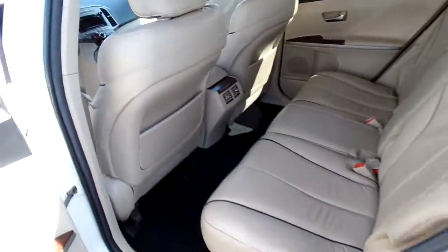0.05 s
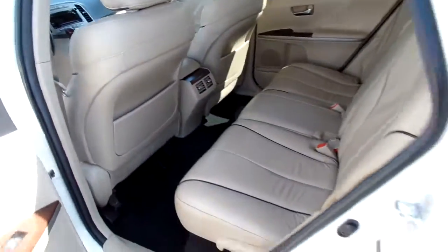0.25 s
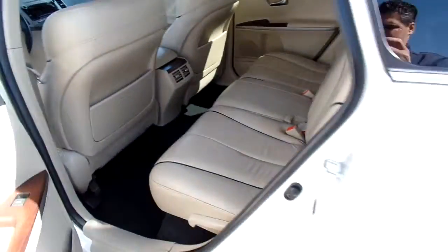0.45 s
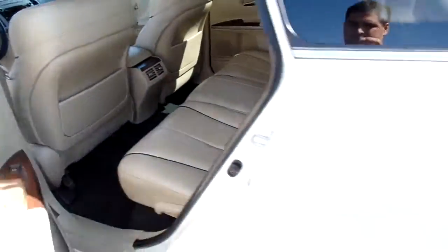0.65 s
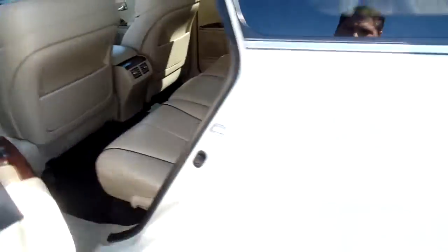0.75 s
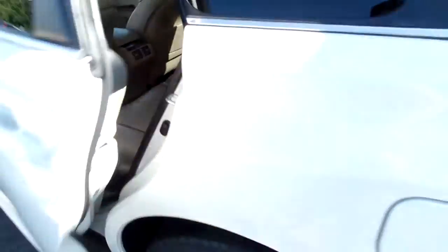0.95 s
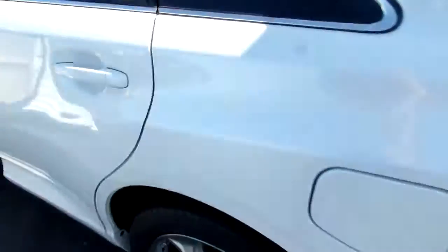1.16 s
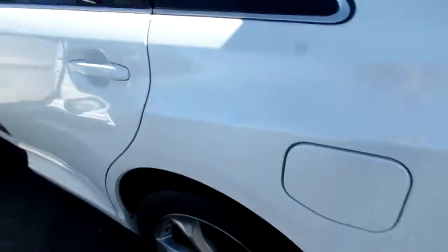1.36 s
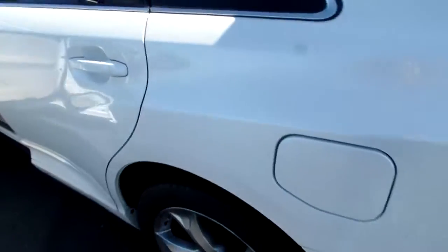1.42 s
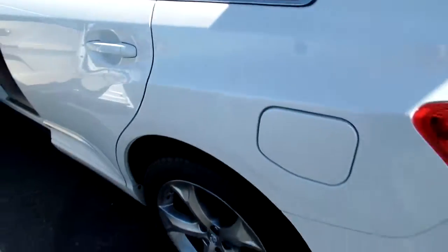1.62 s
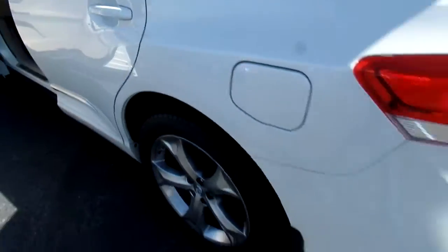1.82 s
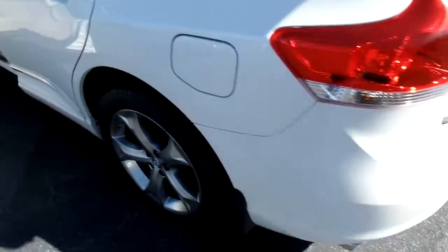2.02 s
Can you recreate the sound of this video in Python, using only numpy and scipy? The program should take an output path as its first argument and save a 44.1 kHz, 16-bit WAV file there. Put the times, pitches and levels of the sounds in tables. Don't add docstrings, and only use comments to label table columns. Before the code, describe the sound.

A car door slams about midway: a hard latch knock, then a sharp hollow thump with a brief panel shudder. Wind buffets the close handheld microphone before it and more strongly afterwards, outdoors over faint traffic.

```python
import sys
import numpy as np
from scipy import signal
from scipy.fft import rfft, irfft, next_fast_len
from scipy.io import wavfile
from scipy.ndimage import uniform_filter1d, map_coordinates

SR = 44100
rng = np.random.default_rng(int(sys.argv[2]) if len(sys.argv) > 2 else 0)


def dump_mix(stems):
    frames = np.atleast_2d(stems).T
    limited = np.clip(frames, -1, 1)
    pcm = np.round(limited * 32767).astype(np.int16)
    wavfile.write(sys.argv[1], SR, pcm)


def natural_amplitude(level_db):
    exponent = np.asarray(level_db, float) / 20
    return 10 ** exponent


N = 91860


def unit(x):
    return x / np.sqrt(np.mean(x ** 2) + 1e-20)


def noise(spectrum):
    m = next_fast_len(N + 8192)
    f, db = np.transpose(spectrum)
    hz = np.fft.rfftfreq(m, 1 / SR)
    colour = natural_amplitude(np.interp(np.log(hz + 1), np.log(f + 1), db))
    return unit(irfft(rfft(rng.standard_normal(m)) * colour, m)[:N])


def wobble(rate):
    knots = rng.standard_normal(int(N * rate / SR) + 4)
    return map_coordinates(knots, [np.arange(N) * rate / SR])


def dying(s, rise_s, t60):
    t = np.maximum(np.arange(N) / SR - s, 0)
    return (1 - np.exp(-t / rise_s)) * natural_amplitude(-60 * t / t60)


def ring(modes, s, rise_s):
    t = np.arange(N) / SR - s
    total = np.zeros(N)
    for hz, db, t60 in modes:
        level = natural_amplitude(db + rng.normal(0, 0.8))
        total += level * dying(s, rise_s, t60) * np.sin(2 * np.pi * hz * t)
    return total / 2


def door_contacts():
    # f/Hz, level/dB, t60/s
    latch_modes = [(608, 1, 0.065), (770, -2, 0.03), (920, -13, .015), (1070, -10, 0.022),
                   (1500, -16, 0.01), (2080, -10, 0.012), (2480, 5, 0.013), (2750, -4, 0.01),
                   (3100, -3, 0.01), (3400, -5, 0.01), (5800, -24, .01)]
    # f/Hz, level/dB, t60/s
    panel_modes = [(63.4, -19, 0.62), (151, -10, 0.11), (230, 0, 0.08), (360, -15, 0.098), (616, -6, 0.053),
                   (980, 1, 0.019), (1350, -14, 0.009)]
    # f/Hz, level/dB
    crack_spectrum = [(250, -6), (500, 4), (1000, 5), (1600, -10.5), (2400, -3.5), (3300, -14.5),
                      (5000, -25), (16000, -31)]
    # t/s, latch level/dB, panel level/dB, crack level/dB
    contacts = [
        (1.1442, 10.5, -11, -7),
        (1.1498, -22, -13, -9),
        (1.1571, -29, -4, -6),
        (1.1606, -7, 3.5, -2.5),
        (1.1623, -23, -1, -8.5),
        (1.1882, -23, -1.5, -8.5),
        (1.2289, -35, -17, -28),
    ]
    crack = noise(crack_spectrum)
    hits = np.zeros(N)
    for s, latch_db, panel_db, crack_db in contacts:
        hits -= natural_amplitude(latch_db) * ring(latch_modes, s, 0.0005)
        hits += natural_amplitude(panel_db) * ring(panel_modes, s, 0.00084)
        hits += natural_amplitude(crack_db) * dying(s, 0.00023, 0.034) * crack
    return hits


def door_shudder():
    # f/Hz, level/dB
    shudder_spectrum = [(30, -30), (70, -9), (230, 1.5), (500, -10.5), (1100, -17.5), (2200, -24),
                        (5000, -34.5), (16000, -47.5)]
    start_s, level_db, t60_s, rough_db = 1.162, -8.5, 0.29, 3
    rough = natural_amplitude(level_db + rough_db * wobble(120))
    return rough * dying(start_s, 0.0033, t60_s) * noise(shudder_spectrum)


def eddies(rows):
    s, db, hz, sign = np.transpose(rows)[..., None]
    at = np.round(s * SR).astype(int) + np.arange(-SR // 40, SR // 40)
    turn = (at / SR - s) * hz
    bell = np.exp(-(turn / 0.43) ** 2 / 2)
    swing = sign * natural_amplitude(db) * bell * np.cos(2 * np.pi * turn)
    return np.bincount(np.clip(at + 1, 0, N + 1).ravel(), swing.ravel(), N + 2)[1:N + 1]


def strong_eddies():
    # t/s, peak level/dB, f/Hz,
    # factor with push + or pull -
    single_eddies = [(0.6042, -20.5, 110, -1.03), (0.6207, -27, 201, 0.85), (0.6365, -18.5, 230, -1.1),
                     (0.6432, -21, 128, 1), (0.6494, -23, 230, -0.71), (0.658, -14.5, 234, 1),
                     (0.6694, -13.5, 190, 1), (0.6791, -11.5, 189, 0.72), (0.6875, -9.5, 272, -1.23),
                     (0.6961, -21, 167, 1), (0.7038, -1.5, 195, 1), (0.7182, -14, 190, -1.3),
                     (0.7932, -14, 225, -0.97), (0.8986, -8.5, 186, 0.49), (0.9148, -8.5, 256, 0.27),
                     (0.959, -17.5, 216, 1), (0.9779, -22, 240, 1), (0.9947, -11, 167, 0.67),
                     (1.0402, -24, 188, 0.9), (1.0544, -16, 233, -0.7), (1.0608, -17, 223, -1.07),
                     (1.0718, -18, 211, 0.64), (1.1349, -10, 244, 0.54),
                     (1.496, -9, 269, 0.57), (1.5133, -5, 256, 0.69), (1.5281, -10, 263, 1),
                  (1.5457, -9, 312, -1.2), (1.553, -11, 211, 0.86), (1.561, -6.5, 334, -1.35),
                  (1.574, -8, 363, -1.1), (1.5838, -11, 257, 0.58), (1.5942, -5, 285, -0.91),
                  (1.604, -13, 240, 0.72), (1.6269, -6, 190, 0.86), (1.6337, -7.5, 246, -1),
                  (1.648, -23, 305, -1.2), (1.6607, -6.5, 278, -1.2), (1.6989, -5.5, 335, 1),
                  (1.706, 2, 266, 0.89), (1.712, -9, 152, -1.5), (1.7256, 3.5, 660, 0.44),
                  (1.738, -13, 142, 0.76), (1.7452, -3.5, 355, 0.93), (1.77, -1.5, 305, -0.9),
                  (1.787, -14, 248, 0.88), (1.7971, -3, 205, -0.69), (1.8107, -3, 290, 0.77),
                  (1.824, -6, 232, 0.89), (1.8964, -11, 213, -1.5), (1.912, -9, 252, 0.96),
                  (1.9199, -9.5, 374, 0.95), (1.9853, -9.5, 326, 0.88),
                     (0.6346, -18.5, 230, 0.88), (0.6515, -14, 266, 1), (0.6558, -15, 282, 1),
              (0.6882, -10.5, 242, 1), (0.7012, -13, 253, 1), (0.862, -26, 90, 1), (0.885, -29, 69, -0.74),
              (0.925, -25, 60, 1), (0.9215, -18, 252, 0.84), (0.9362, -22, 200, 0.78),
              (0.983, -18.5, 236, 1), (1.21, -9, 220, 0.87), (1.232, -10, 201, 1), (1.262, -7.5, 260, 0.64),
              (1.275, -14, 200, -0.89), (1.289, -17, 150, 0.91), (1.311, -16, 260, -1),
              (1.331, -15.5, 225, 0.9), (1.329, -18, 70, 0.94), (1.36, -26, 177, 0.78),
              (1.392, -17, 168, -0.94), (1.435, -23, 300, 1), (1.461, -19, 200, -1),
              (1.485, -15, 200, 0.86), (1.502, -21, 130, 0.81), (1.536, -15, 230, 0.84),
              (1.541, -22, 130, 0.86), (1.6, -2, 258, -0.55), (1.617, -26, 200, 0.77),
              (1.637, -7.5, 151, 1), (1.6555, -9.5, 294, 1), (1.67, -14, 250, 1), (1.553, -20, 597, 0.89),
              (1.5777, -23, 325, 1), (1.718, -13, 200, 1), (1.755, -16, 200, 0.86), (1.781, -18, 150, 1),
              (1.85, -19, 300, 0.69), (1.87, -16, 250, 0.93), (2.016, -15, 176, 0.73),
              (1.9185, -24, 560, 0.63), (1.93, -21, 248, 0.72), (1.947, -21, 198, 1),
                     (0.3547, -22, 68, 1), (0.41, -31, 73, 0.87), (0.5572, -34, 58, -0.67),
                     (0.68, -14, 94, 1), (1.635, -19, 98, 0.43), (1.709, -29, 98, 0.62),
                     (1.796, -20, 75, -0.88), (1.5096, -8.5, 560, -0.86), (1.5292, -10.5, 760, 0.87),
                     (1.5583, -18, 531, -1.3), (1.5672, -10, 525, -1.06), (1.6309, -12.5, 564, -1.78),
                     (1.698, -5, 510, 0.76), (1.7061, -14, 596, 0.83), (1.7251, 1.5, 770, 0.67),
                     (1.7456, -13, 550, 0.97), (1.7727, -27, 563, 1), (1.8113, -18, 593, -1.1)]
    return eddies(single_eddies)


def wind_stream():
    # t/s, level/dB
    strength = [(0, -36), (.2, -36), (.36, -34.5), (.6, -38), (.67, -36), (.72, -29.5), (.83, -37.5),
                (0.921, -30.5), (1.1, -34), (1.3, -28.5), (1.44, -43.5), (1.521, -18), (1.62, -22.5),
                (1.68, -24.5), (1.78, -18.5), (1.86, -30), (1.983, -25), (2.08, -45.5)]
    # f/Hz, level/dB
    rumble_spectrum = [(15, -120), (38, -29), (60, -2.5), (120, 2.5), (250, -3), (500, -17), (900, -120)]
    per_s, usual_hz, quickest_hz, spread = 280, 227, 430, 0.26
    size_db, pitch_per_db = 2, 0.44
    t = np.arange(N) / SR
    at, db = np.transpose(strength)

    u = rng.random((1000, 3))
    s = np.cumsum(-np.log(u[:, 0])) / per_s
    lift = pitch_per_db * (np.interp(s, at, db) - db.mean())
    pitch = usual_hz * np.exp(lift + spread * rng.standard_normal(1000))
    peak_db = -size_db * np.log(u[:, 1])
    rows = np.transpose([s, peak_db, np.minimum(pitch, quickest_hz), np.sign(u[:, 2] - .5)])
    small = unit(eddies(rows[s < N / SR]))

    rumble_db = 1.0 * t + 1.2 * wobble(12.96)
    rumble = natural_amplitude(rumble_db) * noise(rumble_spectrum)
    return natural_amplitude(np.interp(t, at, db)) * (small + rumble)


def scuffs():
    # f/Hz, level/dB
    grit_spectrum = [(1200, -120), (1800, 12.5), (4500, 8.5), (9000, -1.5), (13000, 1.5), (17000, 1)]
    # t/s, level/dB, rise/s, t60/s
    steps = [
        (0.52, -37, 0.00087, 0.044),
        (1.09, -49, .002, 0.044),
        (1.93, -41, 0.018, 0.8),
        (2.053, -47, 0.0016, 0.1),
    ]
    envelope = sum(natural_amplitude(db) * dying(s, rise_s, t60) for s, db, rise_s, t60 in steps)
    return noise(grit_spectrum) * natural_amplitude(1.7 * wobble(170)) * envelope


def traffic():
    # f/Hz, level/dB
    road_spectrum = [(35, -55), (70, -10.5), (250, -8), (500, -10.5), (1200, -13.5), (2200, -22),
                     (3500, -29.5), (16000, -61)]
    fade_db = -1.7 * np.arange(N) / SR
    return natural_amplitude(-33 + fade_db + 0.5 * wobble(38.9)) * noise(road_spectrum)


def microphone_hiss():
    # f/Hz, level/dB
    hiss_spectrum = [(500, -120), (2000, 3), (6000, 4.5), (13000, -0.5), (16500, -1)]
    return natural_amplitude(-51) * noise(hiss_spectrum)


def scene():
    door = door_contacts() + door_shudder()
    wind = strong_eddies() + wind_stream()
    return (door + wind + scuffs() + traffic() + microphone_hiss())[None]


def gain_control(x):
    # t/s, gain level/dB, recovery/(dB per
    # s)
    gain_changes = [
        (.67955, -7, 900),
        (.68697, -5, 400),
        (.70209, -6.5, -800),
        (.707, -10.5, 20),
        (1.1436, -10, -16),
        (1.252, -16, 15),
                    (1.51, -11, -3.5),
        (1.7, -11, -1),
    ]
    t, gain_db = np.arange(N) / SR, np.zeros(N)
    for s, db, rate_db in gain_changes:
        gain_db = np.where(t >= s, np.minimum(db + rate_db * (t - s), 0), gain_db)
    return x * uniform_filter1d(natural_amplitude(gain_db), size=2)


def limiter(x):
    ceiling, knee = 0.75, 8
    return x / (1 + np.abs(x / ceiling) ** knee) ** (1 / knee)


def treble_dropouts(x):
    # from t/s, to t/s
    gaps = [
        (.6905, .6995),
        (1.128, 1.1418),
        (1.1515, 1.157),
    ]
    t = np.arange(N) / SR
    inside = sum((t >= a) & (t < b) for a, b in gaps)
    lost = uniform_filter1d(inside * (1 - 0.04), size=40)
    high = signal.butter(6, 5500, 'high', fs=SR, output='sos')
    return x - lost * signal.sosfiltfilt(high, x)


def low_pass(x):
    return signal.sosfilt(signal.butter(12, 15900, fs=SR, output="sos"), x)


def record(dry):
    x = limiter(gain_control(dry))
    x = signal.sosfiltfilt(signal.cheby2(20, 40, 16050, fs=SR, output='sos'), x)
    return low_pass(treble_dropouts(x))


dry = scene()
out = record(dry)
dump_mix(out)
```